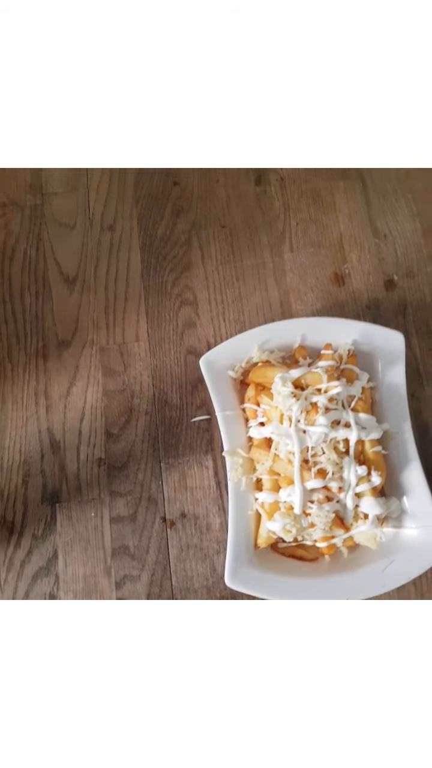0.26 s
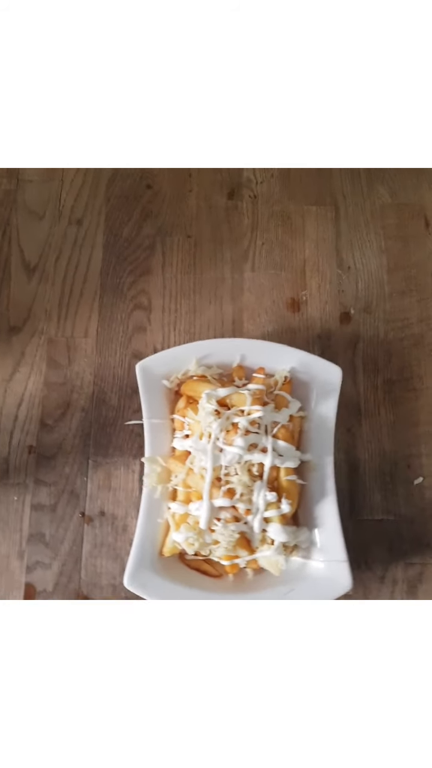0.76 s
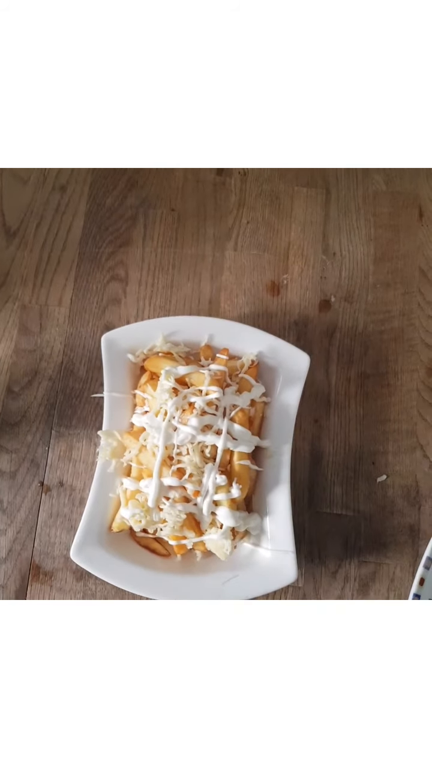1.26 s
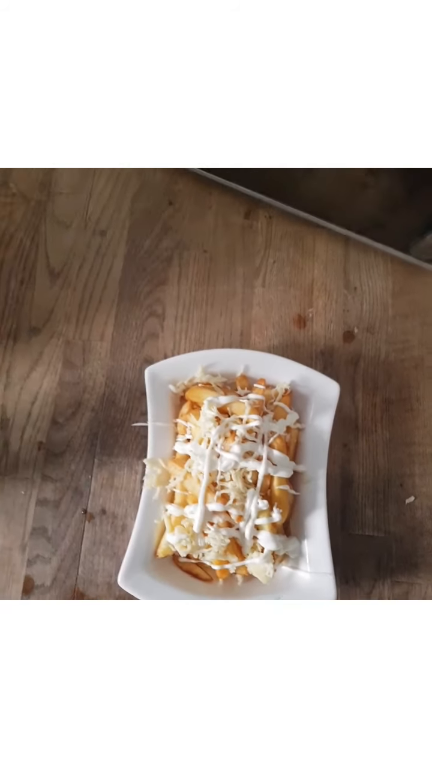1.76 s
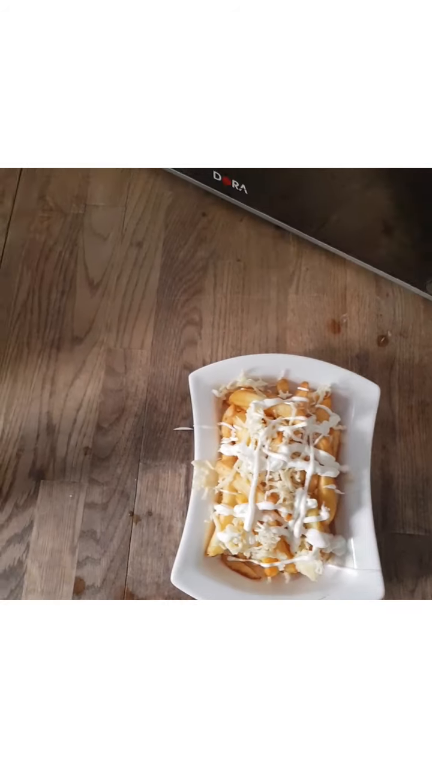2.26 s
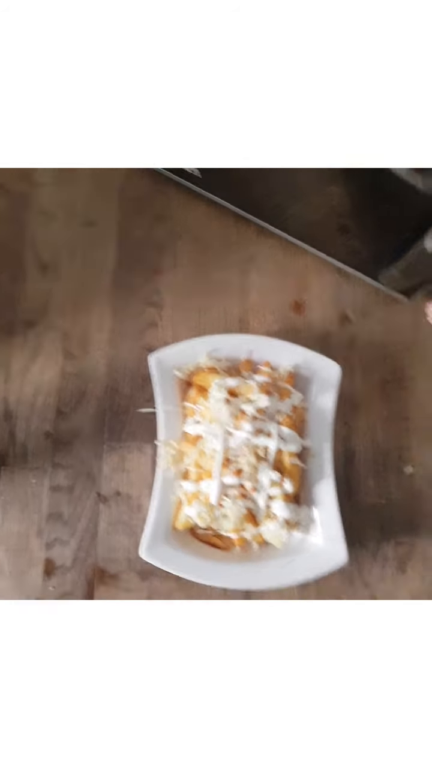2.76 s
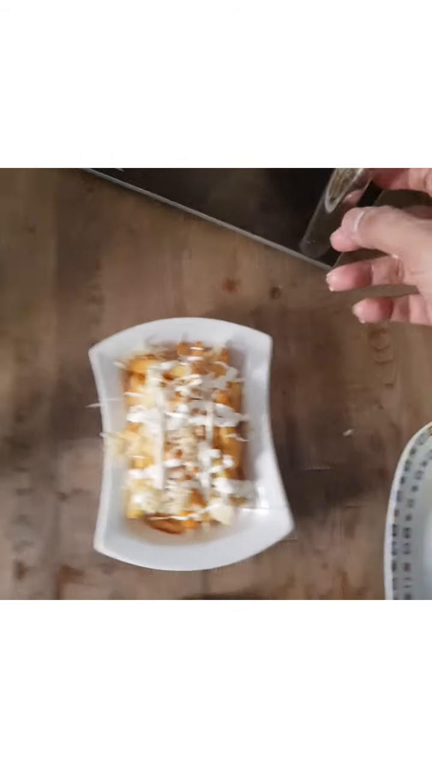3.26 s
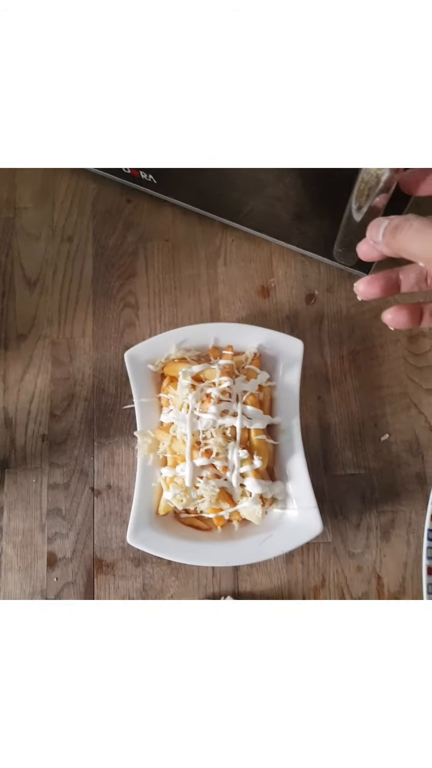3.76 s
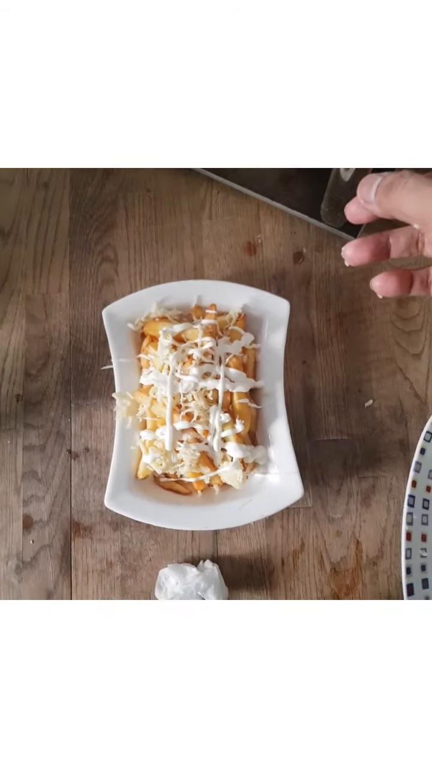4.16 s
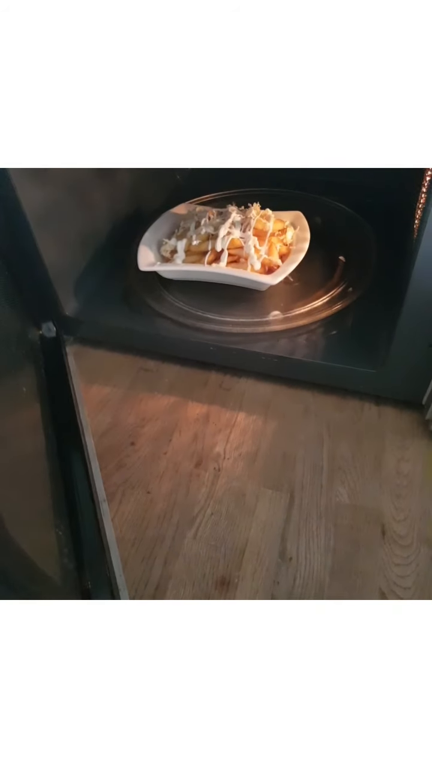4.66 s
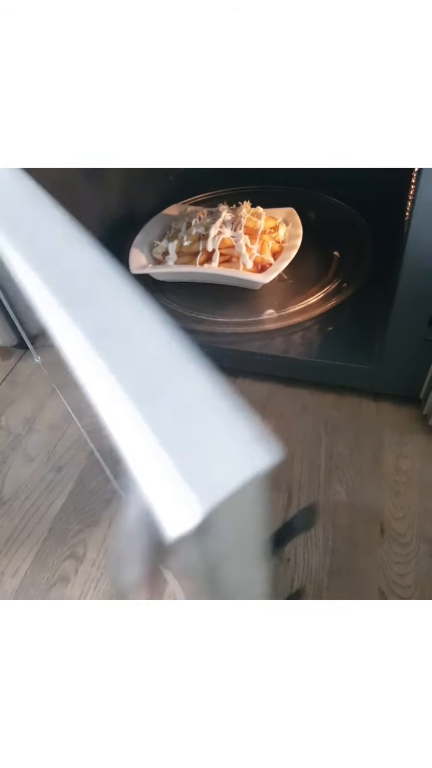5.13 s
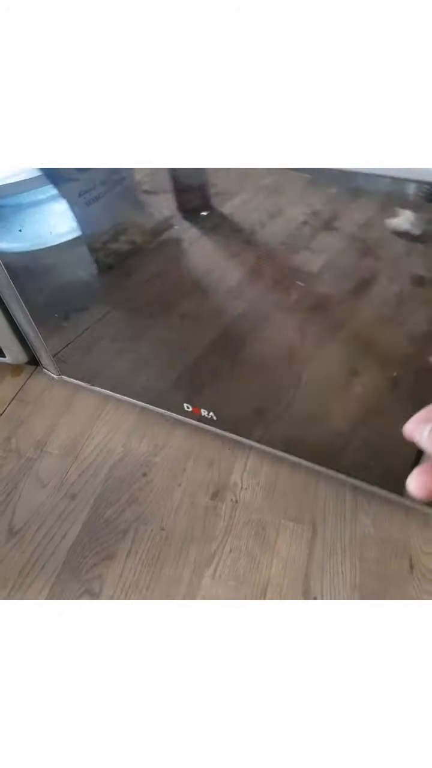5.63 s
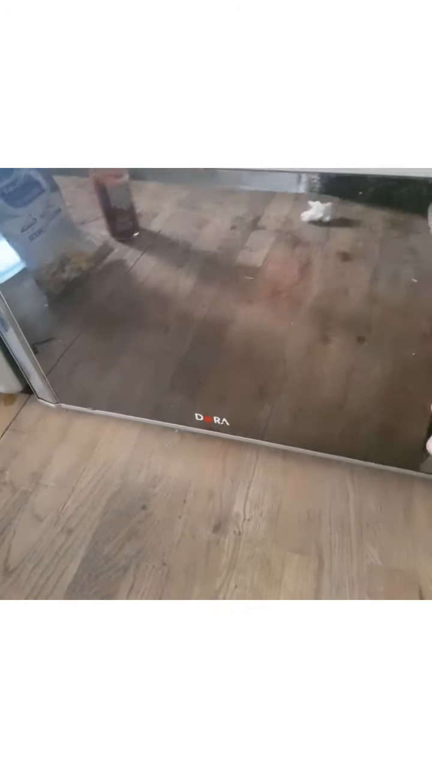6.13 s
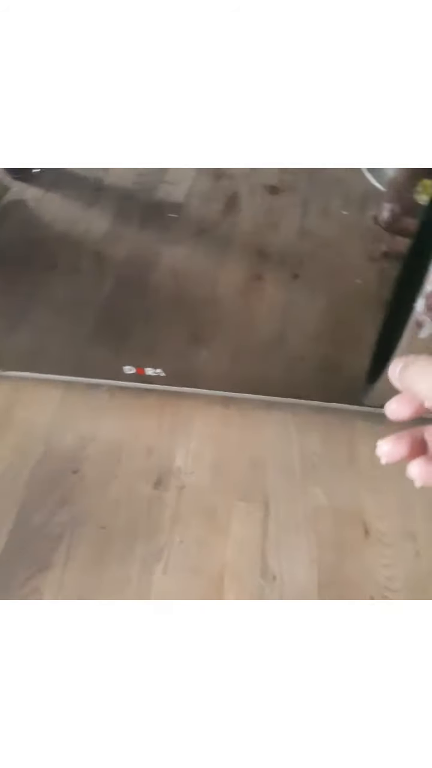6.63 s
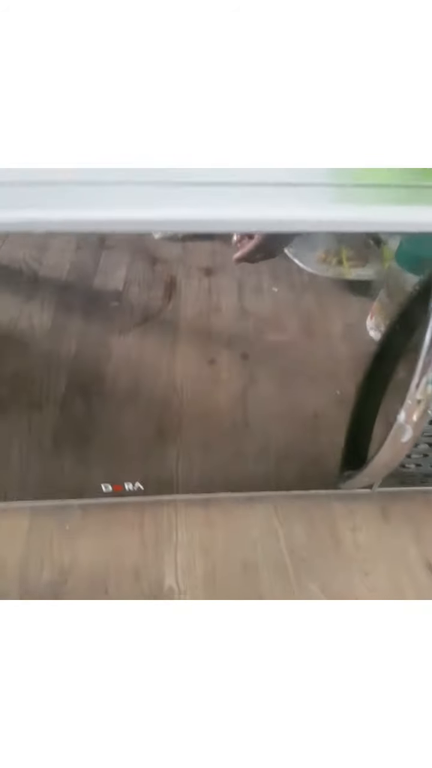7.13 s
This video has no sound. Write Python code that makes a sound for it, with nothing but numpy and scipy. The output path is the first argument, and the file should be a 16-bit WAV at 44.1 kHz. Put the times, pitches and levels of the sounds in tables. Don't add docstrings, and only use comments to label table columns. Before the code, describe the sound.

A low fridge-like motor hum near the bottom of hearing runs throughout, swelling and sinking unevenly every second or so over boomy room rumble, airy murmur and faint hiss. At about 1.3 s a latch clicks brightly and knocks, a rattling cluster with a woody-metallic panel ring, settling by 1.6 s. Around 2.75 to 3.4 s skin or sleeve brushes softly; tiny ticks come at 3.3, 3.4 and 3.9 s. At 4.35 s a small click marks the cut and the background drops, then rises again. A light touch passes at 5.15 s. From 5.83 s a microwave door bumps and scrapes, then slams hardest near 6.19 s, with deep panel thud, thin metal clack, bright tick and half-second hard-room ring. Small thumps follow until 6.3 s. The hum falls quieter, and a brief airy hand brush comes at 6.9 s. Close handheld stereo phone sound, slightly boxy.

```python
import sys
import numpy as np
from scipy import signal
from scipy.fft import rfft, irfft, next_fast_len
from scipy.io import wavfile
from scipy.ndimage import uniform_filter1d

SR = 44100
rng = np.random.default_rng(int(sys.argv[2]) if len(sys.argv) > 2 else 0)


def natural_amplitude(level_db):
    exponent = np.asarray(level_db, float) / 20
    return 10 ** exponent


def materialize(psi):
    bounded = np.clip(np.atleast_2d(psi).T, -1, 1)
    quanta = np.round(bounded * 32767).astype(np.int16)
    wavfile.write(sys.argv[1], SR, quanta)


N = 325899
HUM_WANDER_HZ = 0.3


def unit(x):
    return x / np.sqrt(np.mean(x ** 2))


def shape(x, gain):
    n = next_fast_len(x.shape[-1])
    hz = np.fft.rfftfreq(n, 1 / SR) + 1
    return irfft(rfft(x, n) * gain(hz), n)[..., :x.shape[-1]]


def on_log(table, hz):
    points_hz, values = np.transpose(table)
    return np.interp(np.log(hz), np.log(points_hz), values)


def bell(hz, centre_hz, width_hz):
    return 1 / np.sqrt(1 + (2 * (hz - centre_hz) / width_hz) ** 2)


def below(hz, edge_hz):
    return 1 / np.sqrt(1 + (hz / edge_hz) ** 8)


def spread(a, b):
    # pitch_hz, likeness (1 = same)
    likeness = [(60, 0.96), (130, .98), (290, 0.98), (640, 0.47), (1000, 0.028), (1800, -0.0042),
                (16000, 0.033)]
    share = lambda hz: np.clip(on_log(likeness, hz), -0.999, 0.999)
    mid = shape(a, lambda hz: np.sqrt((1 + share(hz)) / 2))
    side = shape(b, lambda hz: np.sqrt((1 - share(hz)) / 2))
    return np.array([mid + side, mid - side])


def ring(force, modes):
    t = np.arange(SR) / SR
    response = np.zeros(SR)
    for hz, db, t60 in modes:
        response += natural_amplitude(db - 60 * t / max(t60, 0.01)) * np.cos(2 * np.pi * hz * t)
    return signal.fftconvolve(force, response[None], axes=1)[:, :N]


def contacts(table, body, shell, push_s, rattle_db, shell_db, crunch_db, tick_hz, broad, cavity=None):
    push, scrape, tick = np.zeros((1, N)), np.zeros((2, N)), np.zeros((2, N))
    t = np.arange(4096) / SR
    for s, thud_db, clack_db, tick_db, length in table:
        at = slice(int(s * SR), int(s * SR) + len(t))
        length = max(length, 0.0005)
        grit = rng.standard_normal((2, 2, len(t))) * np.exp(-t / length)
        grit = grit * (1 - np.exp(-t / (0.3 * length)))
        push[:, at] -= natural_amplitude(thud_db) * np.sin(np.pi * np.minimum(t / push_s, 1)) / (push_s * SR)
        scrape[:, at] += natural_amplitude(clack_db) * grit[0]
        hissy = broad * min(length / 0.0035, 1.5)
        colour = lambda hz: 3 * bell(hz, tick_hz, tick_hz / 6) ** 2 + hissy * bell(hz, 7300, 12000)
        tick[:, at] += natural_amplitude(tick_db) * shape(grit[1], colour)
    crunch = shape(scrape, lambda hz: bell(hz, 1270, 2500) / np.sqrt(1 + (hz / 3000) ** 10))
    shake = push + natural_amplitude(rattle_db) * (scrape + 3 * scrape.sum(axis=0)) / 7
    panels = natural_amplitude(-3) * ring(shake, body)
    if cavity:
        lag_s = 0.0017
        panels = panels + natural_amplitude(-3) * ring(np.roll(push, int(lag_s * SR)), cavity)
    return panels + natural_amplitude(shell_db) * ring(scrape, shell) + natural_amplitude(crunch_db) * crunch + tick


def oven_door():
    # start_s, thud_db, clack_db, tick_db, length_s
    slam = [(5.828, -29, -28.5, -44, 0.011), (5.844, -35, -21, -35, 0.0028),
            (5.852, -17, -25, -28.5, 0.0039), (5.862, -20, -21.5, -45, 0.009),
            (5.878, -19.5, -27.5, -37, 0.0052), (5.942, -28, -21, -65, .006), (6.111, -38, -31, -70, .008),
            (6.126, -21.5, -25.5, -42, 0.012), (6.163, -41, -17.5, -32, 0.0049),
            (6.170, -18, -12, -31, 0.0054), (6.178, -20, -8.5, -30, 0.01), (6.186, -2, -9, -22.5, 0.0033),
            (6.2, -42, -24.5, -57, 0.031), (6.27, -16, -50, -43.5, 0.022), (6.322, -19, -38, -56, 0.013)]
    faint = [
        (3.277, -70, -40, -48, .006),
        (3.421, -70, -44, -47, .002),
        (3.924, -72, -45, -57, .002),
        (4.66, -70, -50, -57, .002),
    ]
    # pitch_hz, level_db, time to fall 60 dB_s
    body = [(98, -2, .33), (116.8, -15, .5), (119.5, -15, .5), (174, -15, 1.2), (180, -15, 1.2),
            (211, -7, .5), (226, -8, .22), (239, -11, .15), (281, -8, .17), (386, -11, .18), (528, -28, .1),
            (690, -20, .08)]
    shell = [(704, 5.5, 0.035), (806, -1, 0.038), (840, -14, 0.039), (1310, -43, .06), (1432, -3, 0.054),
             (1694, 3, 0.027), (2700, -8, 0.088)]
    cavity = [(147, 1, .12)]
    return contacts(slam + faint, body, shell, push_s=0.0017, rattle_db=-26.5, shell_db=-36,
                    crunch_db=4.5, tick_hz=5830, broad=0.87, cavity=cavity)


def latch_knock():
    # start_s, thud_db, clack_db, tick_db, length_s
    knock = [(1.290, -45, -37, -40, 0.0055), (1.2955, -50, -49, -24.5, 0.0028),
             (1.305, -39, -36.5, -31, 0.0044), (1.328, -32, -35, -45, 0.01),
             (1.343, -36, -25.5, -13.5, 0.0018), (1.353, -23, -33, -38, 0.03),
             (1.384, -9, -23, -19.5, 0.004), (1.392, -30, -26, -32, 0.012), (1.415, -30, -19, -18, 0.0054),
             (1.425, -28, -23, -40, 0.014), (1.45, -22, -29, -48, 0.04), (1.52, -23, -34, -46, 0.012),
             (1.585, -25, -46, -60, .03)]
    # pitch_hz, level_db, time to fall 60 dB_s
    body = [(97, -8, .7), (112, -9, .7), (146, 0, .1), (187, -7, .15), (215, -11, .4), (257, -9, .15),
            (382, -8, .12), (435, -13, .35), (625, -15, .08), (705, -21, .1)]
    shell = [(920, -37, 0.049), (1160, 7, 0.1), (1360, -21, 0.051), (1640, 5, 0.042), (1860, -8, 0.019),
             (2400, -11, 0.032), (2650, 9, 0.027)]
    return contacts(knock, body, shell, push_s=0.0025, rattle_db=-13.5, shell_db=-44,
                    crunch_db=14, tick_hz=7130, broad=1.0)


def room(x):
    t60_s, treble_t60_s, echo_db, dull_hz = 0.44, 0.36, -5, 2920
    t = np.arange(SR // 2) / SR
    noise = spread(*rng.standard_normal((2, len(t)))) * (1 - np.exp(-t / 0.00043))
    dull = shape(noise, lambda hz: bell(hz, 0, 2 * dull_hz))
    tail = dull * natural_amplitude(-60 * t / t60_s) + (noise - dull) * natural_amplitude(-60 * t / treble_t60_s)
    tail = shape(tail, lambda hz: 1 / np.sqrt(1 + (350 / hz) ** 4))
    tail = tail / np.sqrt(np.sum(tail ** 2) / 2) * natural_amplitude(echo_db)
    return x + signal.fftconvolve(x, tail, axes=1)[:, :N]


def fingers():
    # start_s, swell_s, fade_s, level_db, pitch_hz, width_hz
    strokes = [
        (2.75, 0.28, 0.37, -55.5, 2580, 800),
        (2.8, 0.31, .25, -66, 5000, 1200),
        (3.239, 0.081, 0.11, -59, 11500, 8040),
        (5.15, 0.052, 0.14, -58.5, 10700, 9000),
        (6.905, 0.035, 0.17, -50, 5430, 14000),
    ]
    t = np.arange(SR) / SR
    out = np.zeros((2, N + SR))
    for s, up, down, db, centre_hz, width_hz in strokes:
        grain = natural_amplitude(0.64 * unit(uniform_filter1d(rng.standard_normal(SR), size=200)))
        noise = unit(shape(rng.standard_normal((2, SR)), lambda hz: bell(hz, centre_hz, width_hz) ** 2))
        swell = np.interp(t, [0, up, up + down], [0, 1, 0])
        out[:, int(s * SR):int(s * SR) + SR] += natural_amplitude(db) * swell * grain * noise
    return out[:, :N]


def beating():
    # null_s (quietest), crest_s (loudest), crest_db
    swells = [
        (-.35, .48, 0),
        (.98, 1.5, 0),
        (1.79, 2.0, -7),
        (2.18, 2.8, 2),
        (3.55, 4.3, -.5),
        (4.36, 4.42, -14),
        (4.5, 5.0, -1.5),
        (5.37, 6.2, 1),
        (7.17, 8, -1),
    ]
    t = np.arange(N) / SR
    null, crest, crest_db = np.transpose(swells)
    turn = np.interp(t, np.ravel([null, crest], order="F"), np.arange(2 * len(null)) / 2)
    level_db = crest_db[turn.astype(int)]
    flutter_db = 1.6 * unit(shape(rng.standard_normal(N), lambda hz: bell(hz, 0, 23) ** 2))
    swell = np.abs(np.sin(np.pi * turn)) ** 0.7
    return natural_amplitude(level_db + flutter_db) * np.hypot(swell, natural_amplitude(-24))


def tone(hz, wander):
    return np.sqrt(2) * np.sin(2 * np.pi * np.cumsum(hz + wander) / SR)


def kitchen():
    # time_s, gain_db
    phone_gain = [(0, 0.5), (.75, 0.5), (1.3, 0.5), (1.75, -2), (2.7, -2.5), (3.5, -2), (4.1, 1.5),
                  (4.346, 1), (4.352, -5.5), (5.1, 0.5), (5.45, 0), (6.15, 1.5), (6.45, -4.5), (7.39, -4.5)]
    # pitch_hz, level_db per Hz
    air_colour = [(30, -32), (120, -15), (300, -20), (600, -23.5), (2600, -31), (4000, -29.5),
                  (10000, -34.5), (16000, -47)]
    # pitch_hz, width_hz,
    # level_db
    boom = [(48.3, 15, -13), (90.4, 8.4, -4), (115.2, 12, -0.5), (147.4, 1.7, -16), (179.9, 9.3, -6.5),
            (214, 11, -11.5), (238, 12.7, -12.5), (349.7, 34, -12.5), (425.2, 9.4, -13)]
    # pitch_hz, level_db over the rumble
    overtones = [(115.3, -3.5), (120, -11.5), (174.5, -9.5)]
    gain_db = np.interp(np.arange(N) / SR, *np.transpose(phone_gain))
    wander = HUM_WANDER_HZ * unit(shape(rng.standard_normal(N), lambda hz: bell(hz, 0, 2.9) ** 2))
    hum = tone(57.5, wander) * beating()
    noise = spread(*rng.standard_normal((2, N)))
    air = lambda hz: natural_amplitude(on_log(air_colour, hz))
    rumble = unit(shape(noise, lambda hz: air(hz) * below(hz, 410))) * natural_amplitude(-4.0)
    for centre_hz, width_hz, db in boom:
        rumble = rumble + natural_amplitude(db) * unit(shape(noise, lambda hz: bell(hz, centre_hz, width_hz) ** 2))
    for hz, db in overtones:
        rumble = rumble + natural_amplitude(db) * tone(hz, 2 * wander)
    murmur = shape(noise, lambda hz: air(hz) * below(450, hz) * below(hz, 2750) ** 2)
    hiss = shape(noise, lambda hz: air(hz) * below(3860, hz))
    out = hum * natural_amplitude(-37.5 + gain_db)
    out = out + unit(rumble) * natural_amplitude(-39.5 + gain_db)
    out = out + unit(murmur) * natural_amplitude(-46.5 + 1.17 * gain_db)
    return out + unit(hiss) * natural_amplitude(-60 + 0.99 * gain_db)


def scene():
    return room(latch_knock() + oven_door()) + fingers() + kitchen()


def band_limit(x):
    return signal.sosfilt(signal.butter(12, 15850, fs=SR, output="sos"), x)


def record(dry):
    # pitch_hz, width_hz, level_db
    mic_peaks = [(3240, 577, -3), (5000, 2230, 3), (6900, 350, 3.5), (7970, 1280, -10.5), (11500, 230, 1)]
    # pitch_hz, width_hz, level_db
    left_over_right = [(60, 60, .6), (320, 80, -3), (1100, 300, -1.5), (11000, 3000, 1.5)]
    low_hz, top_hz, change_s = 46.6, 15850, 4.348

    def bumps(table, hz):
        return sum(db * np.exp(-0.5 * ((hz - f) / width) ** 2) for f, width, db in table)

    def response(hz):
        tilt = np.array([[0.5], [-0.5]])
        peaks = natural_amplitude(bumps(mic_peaks, hz) + tilt * bumps(left_over_right, hz))
        return peaks / np.sqrt(1 + (low_hz / hz) ** 8 + (hz / top_hz) ** 200)

    x = shape(dry, response)
    t = np.arange(N) / SR - change_s
    x = x - 0.025 * (t < 0) * np.exp(np.minimum(t, 0) / 0.003)
    return band_limit(np.clip(x, -1, 1))


dry = scene()
out = record(dry)
materialize(out)
```